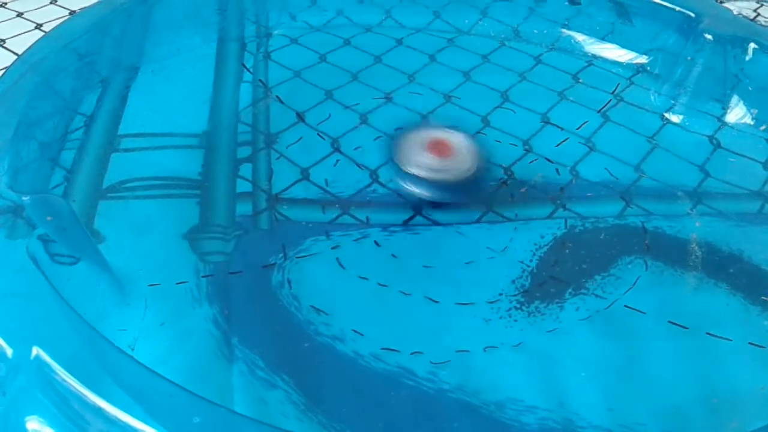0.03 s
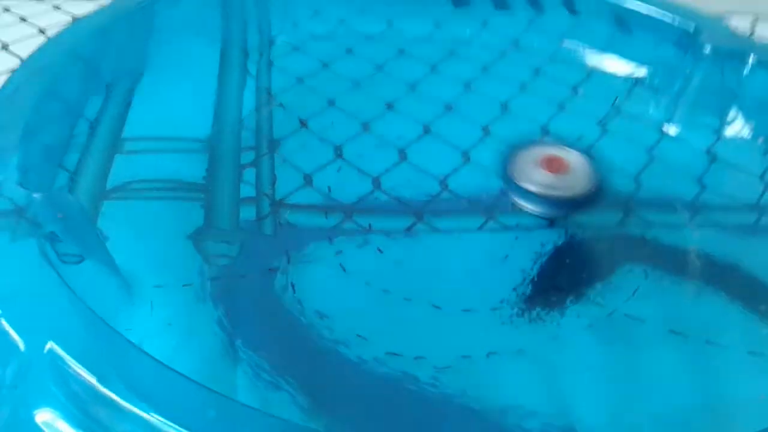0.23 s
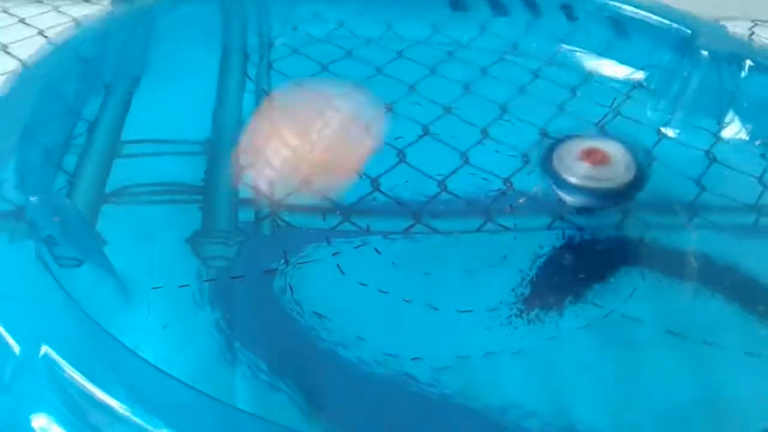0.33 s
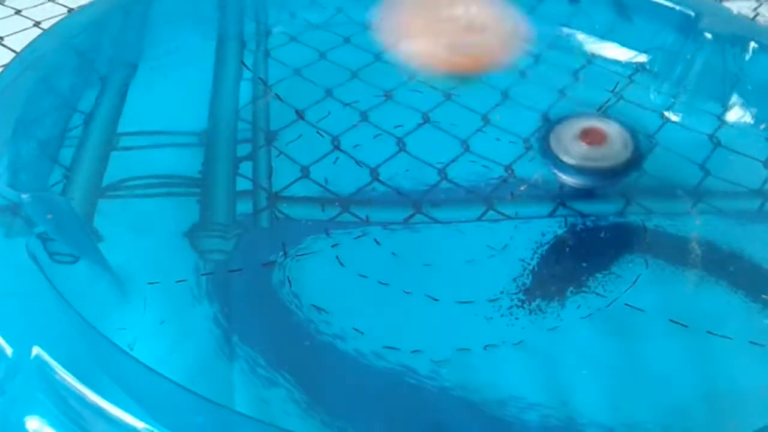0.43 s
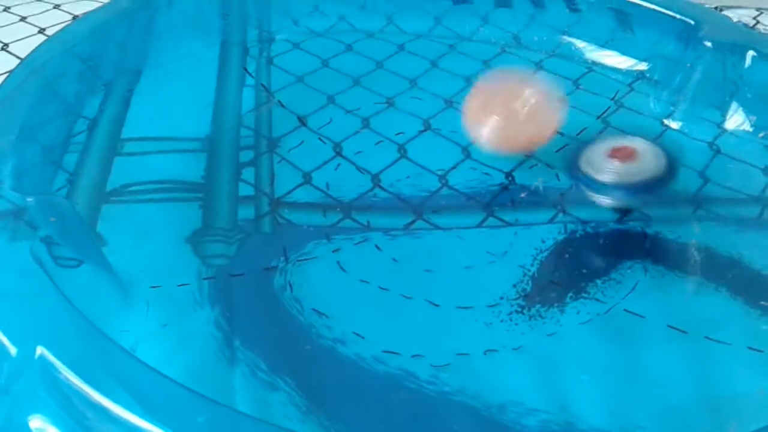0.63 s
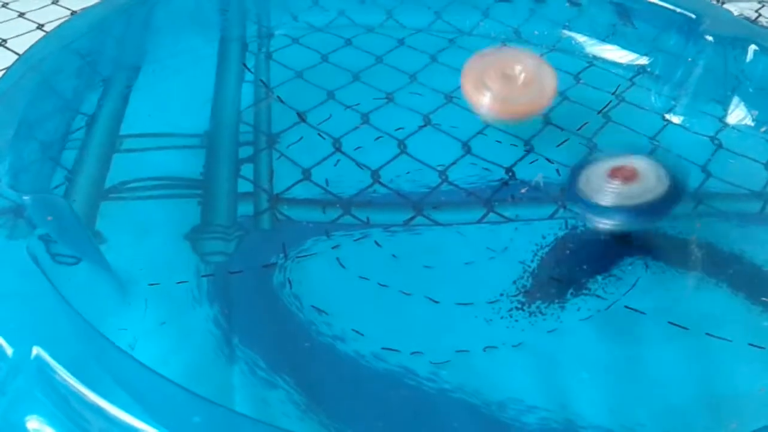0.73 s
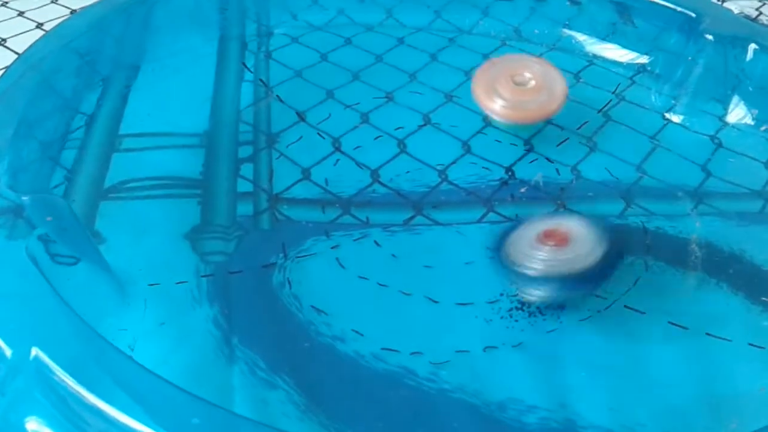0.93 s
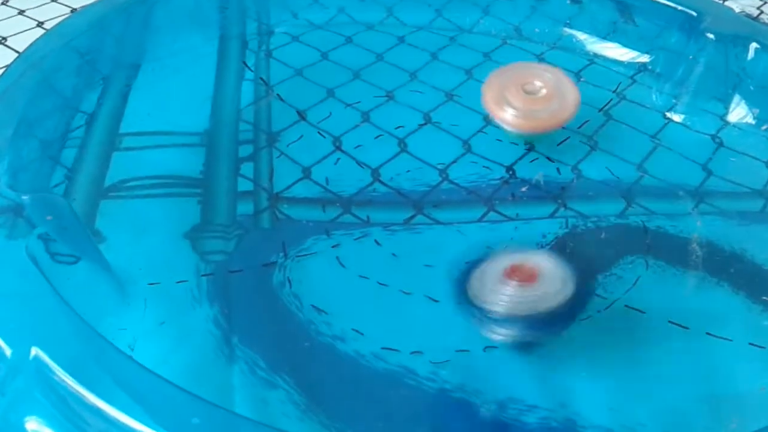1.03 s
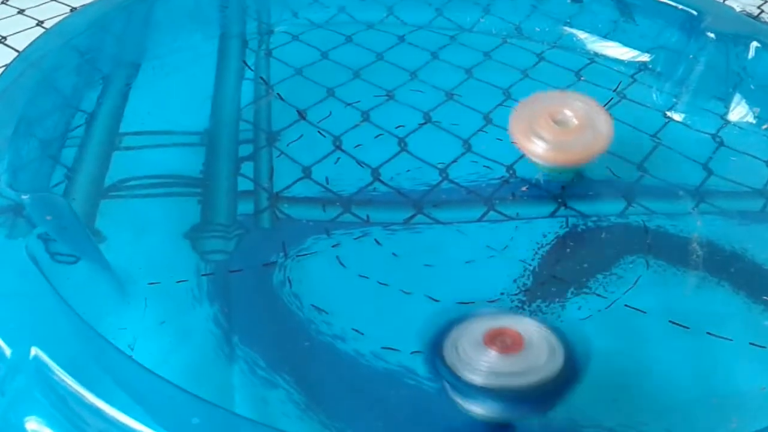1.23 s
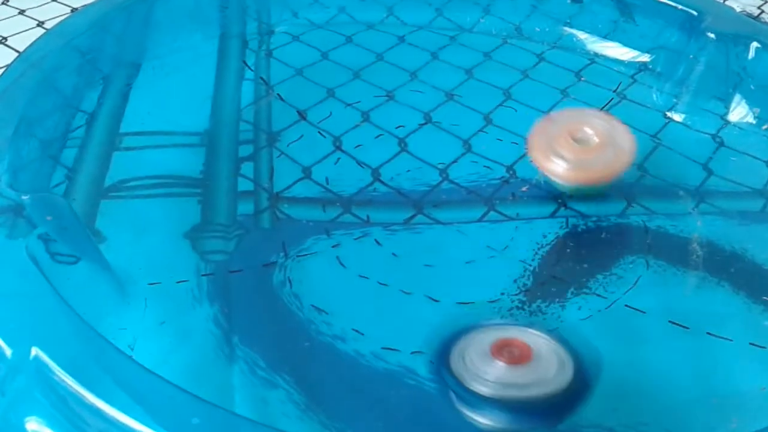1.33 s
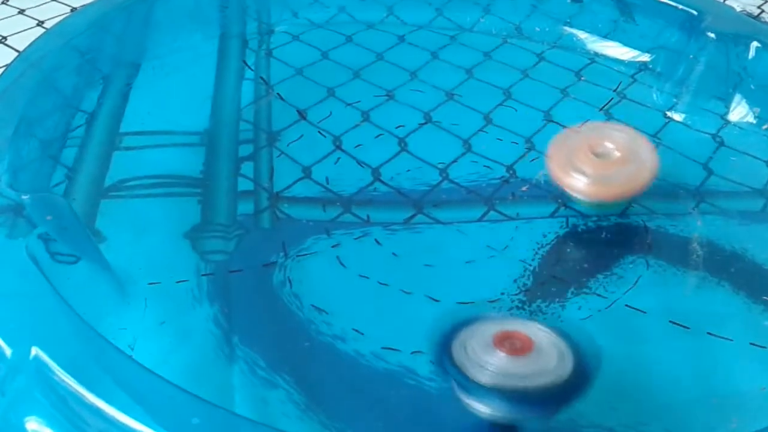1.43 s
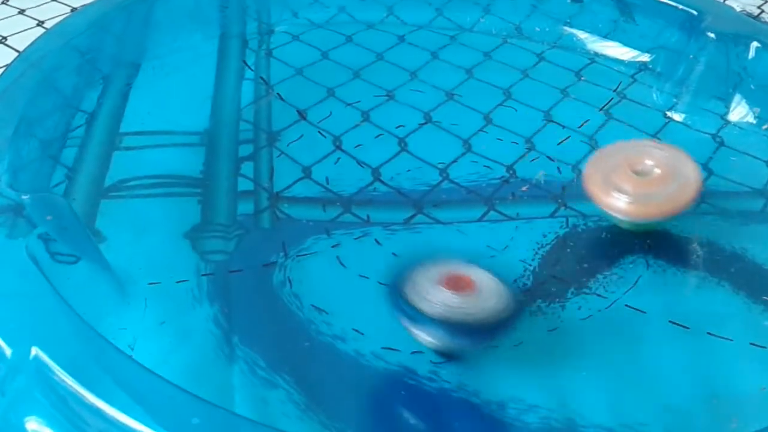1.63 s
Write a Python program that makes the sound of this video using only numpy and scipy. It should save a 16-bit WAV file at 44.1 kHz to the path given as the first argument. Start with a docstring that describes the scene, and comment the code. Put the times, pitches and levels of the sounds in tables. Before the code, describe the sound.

A spinning top launcher rasps, snaps loudly and rattles down, close up in a small room. The top knocks onto a hard plastic floor and clashes once with a second top, and both spin on with faint scuffing.

```python
"""A toy top spins in a hard plastic arena, its tip scuffing the floor by friction, while a hand bumps a
launcher above it. The pull drives teeth ever faster over a gear, so the pitch rips upward; the launcher
snaps against its stop and its ratchet runs down. The second top thuds onto the floor and excites its
modes, clashes rims with the first, and bounces. Both spin on with ticking tips in a small room."""
import sys
import numpy as np
from scipy import signal
from scipy.fft import rfft, irfft
from scipy.io import wavfile
from scipy.ndimage import uniform_filter1d

SR = 44100
rng = np.random.default_rng(int(sys.argv[2]) if len(sys.argv) > 2 else 0)


def store_wav(level_fs):
    """Save 16-bit WAV to argv[1]."""
    pcm = np.round(np.clip(np.atleast_2d(level_fs), -1, 1) * 32767)
    wavfile.write(sys.argv[1], SR, pcm.T.astype(np.int16))


N = 74970
T = np.arange(N) / SR
RING_T = T[:SR // 2]


def amp(db):
    """Decibels to amplitude ratio."""
    return 10 ** (np.asarray(db) / 20)


def curve(rows, column=1):
    """Linear interpolation of a table's column over time."""
    rows = np.array(rows)
    return np.interp(T, rows[:, 0], rows[:, column])


def at_frequency(points, hz):
    """Interpolation on a logarithmic frequency axis."""
    knots_hz, values = np.transpose(points)
    return np.interp(np.log(hz + 1), np.log(knots_hz + 1), values)


def add(mix, start_s, sound):
    """Superposition: a sound joins the mix at its onset."""
    part = mix[round(start_s * SR):][:len(sound)]
    part += sound[:len(part)]


def convolve(x, response):
    """Convolution with an impulse response, cut to the input's length."""
    return signal.fftconvolve(x, response)[:len(x)]


def colour(x, spectrum, size=4096):
    """Minimum-phase filtering to a given spectral shape, with unit energy."""
    log_gain = np.log(amp(at_frequency(spectrum, abs(np.fft.fftfreq(size, 1 / SR)))))
    response = np.exp(np.conj(signal.hilbert(log_gain)))
    taps = np.fft.ifft(response).real[:size // 2]
    return convolve(x, taps / np.linalg.norm(taps))


def highpass(x, hz):
    """Second-order attenuation below a cutoff."""
    return signal.sosfilt(signal.butter(2, hz, "highpass", fs=SR, output="sos"), x)


def fade(t60):
    """Damping: an exponential fall of 60 dB in t60 seconds."""
    return np.exp(-np.log(1000) * RING_T / t60)


def burst(t60):
    """Modal overlap: dense, short-lived vibrations merge into decaying noise."""
    return rng.standard_normal(len(RING_T)) * fade(t60)


def wash(decay):
    """Frequency-dependent damping: each band of noise dies at its own rate."""
    spectrum = rfft(rng.standard_normal(len(RING_T)))
    hz = np.fft.rfftfreq(len(RING_T), 1 / SR)
    centres, t60s = zip(*decay)
    bands = [at_frequency(list(zip(centres, weights)), hz) for weights in np.eye(len(decay))]
    return sum(irfft(spectrum * band, len(RING_T)) * fade(t60) for band, t60 in zip(bands, t60s))


def ring(modes):
    """Free vibration: a sum of damped sinusoids."""
    return sum(amp(db) * fade(t60) * np.sin(2 * np.pi * hz * RING_T) for hz, db, t60 in modes)


def uneven(spread_db):
    """Log-normal gains, limited to two standard deviations."""
    return amp(spread_db * np.clip(rng.standard_normal(N), -2, 2))


def clicks(rate, spread_db):
    """Impulse train: one uneven click per cycle, mean power near 1."""
    due = np.diff(np.floor(np.cumsum(rate) / SR), prepend=0)
    return due * np.sqrt(SR / rate) * uneven(spread_db)


def jitter(depth, samples):
    """Random modulation: a factor that wanders smoothly about 1."""
    drift = uniform_filter1d(rng.standard_normal(N), samples)
    return np.exp(depth * drift / np.sqrt(np.mean(drift ** 2)))


def chatter(hits, t60):
    """Incoherent addition: each click starts a short scrape of noise, and their powers sum."""
    power = fade(t60) ** 2
    envelope = np.sqrt(abs(convolve(hits ** 2, power / power.sum())))
    return envelope * rng.standard_normal(N)


# partials of the hum (frequency [Hz], level [dB])
HUM_PARTIALS = [(60, -73.5), (90, -84.5), (180, -76), (328, -79.5)]
# spectrum of the room's air (frequency [Hz], relative level [dB])
AIR_SPECTRUM = [(15, -28), (35, -11), (70, -3), (200, 4), (330, 2.5), (450, 0.5), (1300, -4.5), (3000, -14),
                (5500, -25), (15500, -36.5)]
def background():
    """Noise floor: a faint tonal hum over the broadband noise of the air."""
    hum = sum(amp(db) * np.sqrt(2) * np.sin(2 * np.pi * (hz * T + rng.random()))
              for hz, db in HUM_PARTIALS)
    return hum + amp(-67) * colour(rng.standard_normal(N), AIR_SPECTRUM)


# spinning tips (time [s], rotation rate [1/s], relative tick level [dB], rumble level [dB])
TIP_SPIN = [(0, 163, -50, -52.5), (.08, 145, -47.5, -52.5), (.17, 142, -46.5, -44.5),
            (.4, 132, -41.5, -61.5), (.57, 120, -68.5, -62.5), (.85, 126, -58.5, -59.5),
            (.95, 101, -59.5, -53), (1.04, 95, -59.5, -60), (1.15, 92.4, -62, -66.5), (1.35, 97, -69, -69),
            (1.52, 100, -70, -70.5), (1.63, 94, -64.5, -64), (1.7, 98, -72, -76.5)]
# spectra of the tick and the floor's rumble (frequency [Hz], relative level [dB])
TIP_SPECTRUM = [(40, -24.5), (200, 12.5), (800, 6), (1700, -4), (2600, -7), (3900, 0), (4700, 4),
                (5600, 0.5), (7500, -9.5), (9000, -7), (11500, -5.5), (13000, -17.5), (16000, -21)]
RUMBLE_SPECTRUM = [(25, -44.5), (70, -0.5), (130, 4.5), (280, -6.5), (420, -10), (800, -6.5), (1600, -14.5),
                   (3000, -18.5), (6000, -24), (15000, -40)]
# resonances excited by scuffing (frequency [Hz], bandwidth [Hz], relative level [dB])
SCUFF_BANDS = [(880, 440, 0), (1650, 700, 2.5), (3537, 730, -2), (4650, 1400, 0), (6940, 2000, -3),
               (9100, 670, -6.5), (11020, 2100, -5)]
def tips():
    """Friction: about once a turn a tip scuffs, exciting resonances unevenly, as the floor rumbles."""
    turns = clicks(curve(TIP_SPIN) * jitter(.15, samples=300), spread_db=2.5)
    turns *= amp(curve(TIP_SPIN, column=2))
    ticks = amp(-9) * colour(chatter(turns, t60=0.0096), TIP_SPECTRUM)
    for hz, width, db in SCUFF_BANDS:
        scuff = chatter(turns * uneven(spread_db=2.5), t60=0.02)
        resonance = signal.butter(2, [hz - width / 2, hz + width / 2], "bandpass", fs=SR, output="sos")
        ticks += amp(db - 12) * signal.sosfilt(resonance, scuff) * np.sqrt(SR / 2 / width)
    rumble = rng.standard_normal(N) * amp(curve(TIP_SPIN, column=3))
    return ticks + colour(rumble, RUMBLE_SPECTRUM)


# whirring of the tops (time [s], level [dB])
DRONE_LEVEL = [(0, -60), (1.2, -79.5), (1.4, -67), (1.6, -67), (1.7, -69)]
def drone(hz=267.5):
    """Amplitude modulation: the tops whirr in one faint tone of slowly changing level."""
    return amp(curve(DRONE_LEVEL)) * np.sin(2 * np.pi * hz * T)


# skids of a tip (time [s], level [dB], t60 [s])
TIP_SKIDS = [(.003, -39.5, 0.028), (.0125, -35.5, 0.0067), (0.0155, -38.5, .018), (.108, -43, .015),
             (.956, -48, .025), (1.022, -46.5, 0.024), (1.0852, -46, 0.016), (1.111, -55, 0.021),
             (1.13, -53, 0.035), (1.2136, -54, .02), (1.2605, -57.5, 0.027), (1.2763, -51.5, 0.021),
             (1.4086, -53, 0.02), (1.475, -63, 0.044), (1.6575, -50.5, 0.028), (1.6745, -47.5, 0.016),
             (1.6855, -53.5, 0.037), (1.69, -49, 0.029)]
# spectrum of a skid (frequency [Hz], relative level [dB])
SKID_SPECTRUM = [(60, -24.5), (300, -5.5), (1500, 0.5), (3800, -3.5), (5000, -1.5), (6000, -2.5),
                 (7500, -6.5), (10500, -2.5), (13000, -20), (16000, -6)]
def skids():
    """Sliding friction: each slip of a tip gives a sharp burst of noise."""
    slips = np.zeros(N)
    for s, db, t60 in TIP_SKIDS:
        add(slips, s, amp(db) * burst(t60))
    return colour(slips, SKID_SPECTRUM)


# bumps of hand and launcher (time [s], level [dB], frequency [Hz])
HAND_BUMPS = [(0.016, -29.5, 70), (0.05, -33.5, 163), (0.082, -35, 200.2), (.133, -47, 121),
              (0.173, -27, 115), (0.333, -30, 247), (0.929, -38, 91), (1.148, -44.5, 87.1)]
def bumps():
    """Soft impact: one low damped mode, whose gradual onset leaves no click."""
    thuds = np.zeros(N)
    onset = 1 - fade(t60=0.0059)
    for s, db, hz in HAND_BUMPS:
        add(thuds, s, ring([(hz, db, 0.026)]) * onset)
    return thuds


# teeth passing the gear (time [s], rate [1/s])
MESH_RATE = [(.17, 370), (.19, 492), (.2, 670), (.211, 800), (.22, 960), (.229, 1300), (.238, 1120),
             (.25, 1330)]
# strength of the pull (time [s], relative whine level [dB], relative rasp level [dB])
PULL_LEVELS = [(.165, -67.5, -57.5), (.188, -27, -37), (.207, -22, -30.5), (.2095, -22, -15),
               (.229, -23, -23), (.238, -33.5, -31.5), (.25, -38, -28.5), (.256, -67.5, -85)]
# spectra of whine and rasp (frequency [Hz], relative level [dB])
WHINE_SPECTRUM = [(200, -30.5), (600, -9), (1000, -3.5), (1550, 3.5), (2400, -6), (3400, -5.5), (5000, -11),
                  (9000, -30.5), (16000, -46.5)]
RASP_SPECTRUM = [(100, -29.5), (400, -10.5), (900, -17.5), (1500, -2), (2500, -3), (3300, 3), (4200, -2.5),
                 (5800, 2), (7500, -7.5), (10000, -5.5), (15500, -14.5)]
def rip():
    """Gear meshing: the rising tooth rate sets the pitch of a whine, and each tooth adds a dry rasp."""
    pulling = (T > PULL_LEVELS[0][0]) & (T < PULL_LEVELS[-1][0])
    teeth = clicks(curve(MESH_RATE) * jitter(.03, samples=100), spread_db=3) * pulling
    whine = teeth * amp(curve(PULL_LEVELS) - 5)
    rasp = chatter(teeth, t60=0.0067) * amp(curve(PULL_LEVELS, column=2) - 3.5)
    return colour(whine, WHINE_SPECTRUM) + colour(rasp, RASP_SPECTRUM)


# launcher impacts (time [s], pulse level [dB], thump level [dB], crack level [dB])
LAUNCHER_HITS = [(.209, -56, -46, -19), (0.2494, -3.5, -11, -13.5), (0.2527, -23, -9, -7.5),
                 (0.2566, -15, -13.5, -10), (0.2596, -30, -37.5, -16.5)]
# spectra of thump and crack (frequency [Hz], relative level [dB])
THUMP_SPECTRUM = [(20, -26.5), (100, -7), (260, -3.5), (380, -9), (480, -4.5), (600, -8.5), (760, -1.5),
                  (960, -1.5), (1400, -12.5), (2500, -16), (5000, -27.5)]
CRACK_SPECTRUM = [(710, -14), (1200, -7), (2620, -9), (3810, -4), (5490, -10), (8240, -11.5), (8880, -5.5),
                  (11600, -14.5), (15500, -10)]
def snap(swing_s=0.00064):
    """Impact transients: the launcher jolts, then hits its stop, with pulses, thumps and cracks."""
    u = RING_T / swing_s
    pulse = -u * (2 - u) * np.exp(-u)  # one swing of pressure and its slower return
    pulse /= abs(pulse).max()
    pulses, thumps, cracks = np.zeros((3, N))
    for s, pulse_db, thump_db, crack_db in LAUNCHER_HITS:
        add(pulses, s, amp(pulse_db) * pulse)
        add(thumps, s, amp(thump_db) * burst(t60=0.021))
        add(cracks, s, amp(crack_db) * burst(t60=0.032))
    return pulses + colour(thumps, THUMP_SPECTRUM) + colour(cracks, CRACK_SPECTRUM)


# slowing gear (time [s], click rate [1/s], ping level [dB], rattle level [dB])
GEAR_RUNDOWN = [(.262, 480, -32, -23.5), (.276, 420, -44, -28.5), (.281, 400, -44, -19),
                (.3, 325, -26.5, -24.5), (.32, 235, -34, -26.5), (.34, 175, -31.5, -31),
                (.362, 140, -29.5, -34.5), (.385, 105, -34.5, -43), (.413, 48, -39.5, -43.5)]
# modes of the pawl (frequency [Hz], relative level [dB], t60 [s])
PAWL_MODES = [(3390, 5, 0.0083), (3625, 4, 0.011), (3793, 7.5, 0.0078), (4040, -5, .008)]
# spectrum of the housing (frequency [Hz], relative level [dB])
RATTLE_SPECTRUM = [(180, -61), (300, -19), (849, -34.5), (1030, -33.5), (1160, -12.5), (1330, -11.5),
                   (2830, -11), (3690, -4), (4210, -4.5), (4960, -13.5), (5760, -9), (9140, -8.5),
                   (15500, -17.5)]
def ratchet(rise_s=0.00072):
    """Repeated impact: each tooth of the freed, slowing gear rings the pawl and rattles the housing."""
    coasting = (T > GEAR_RUNDOWN[0][0]) & (T < GEAR_RUNDOWN[-1][0])
    teeth = clicks(curve(GEAR_RUNDOWN), spread_db=0.5) * coasting
    ping = ring(PAWL_MODES) * (1 - np.exp(-(RING_T / rise_s) ** 2))
    pings = convolve(teeth * amp(curve(GEAR_RUNDOWN, column=2)), ping / np.linalg.norm(ping))
    rattle = chatter(teeth, t60=0.031) * amp(curve(GEAR_RUNDOWN, column=3))
    return pings + colour(rattle, RATTLE_SPECTRUM)


# a top's landings (time [s], boom level [dB], boom centre [Hz], knock level [dB], tick level [dB])
FLOOR_HITS = [(.3832, -19.5, 281, -15, -18), (0.3871, -23.5, 946, -17.5, -25), (.3958, -43, 300, -31, -39),
              (0.412, -34, 294, -29.5, -35), (.6172, -44.5, 328, -26.5, -24), (.734, -34, 164, -36, -32),
              (.7372, -78, 164.4, -36, -29.5), (.762, -45, 576, -44, -40), (.773, -78, 599, -50, -37.5),
              (0.8394, -44, 165, -41.5, -36.5), (.843, -50.5, 280, -42, -32.5),
              (0.9064, -47, 139, -46.5, -41), (.949, -56, 129, -49.5, -46), (1.666, -52.5, 695, -59.5, -71)]
# modes of the arena floor (frequency [Hz], relative level [dB], t60 [s])
FLOOR_MODES = [(144.4, -13, 0.51), (174.6, 2.5, 0.13), (209, -4, 0.17), (234.7, -1, 0.18), (284.8, 1, 0.17),
               (348, -11.5, 0.14), (601, 1, 0.06), (726, -8, 0.11), (787, -0.5, 0.076), (878, -3.5, 0.18),
               (963.8, -5.5, 0.22), (1093, -16, 0.27)]
# ringing after a knock (frequency [Hz], t60 [s])
KNOCK_T60 = [(100, 0.45), (500, 0.21), (1500, 0.11), (5000, 0.21), (14000, .15)]
# spectra of knock and tick (frequency [Hz], relative level [dB])
KNOCK_SPECTRUM = [(20, -42), (55, -15), (110, -12.5), (220, -4), (420, -9), (600, -9.5), (950, -3.5),
                  (1300, -10.5), (1900, -10), (3500, -22.5), (6000, -28.5), (15000, -39)]
TICK_SPECTRUM = [(30, -27), (150, 7.5), (1000, -3.5), (2600, -1.5), (3200, -11), (5600, -2), (7500, -19.5),
                 (15000, -17)]
def landings(spot_octaves=0.52, least_share=0.23):
    """Modal excitation: a top ticks and knocks on the thin floor; the spot sets which modes boom most."""
    booms, knocks, ticks = np.zeros((3, N))
    mode_hz = np.array(FLOOR_MODES)[:, 0]
    for s, boom_db, centre_hz, knock_db, tick_db in FLOOR_HITS:
        shares = least_share + np.exp(-(np.log2(mode_hz / centre_hz) / spot_octaves) ** 2)
        boom = sum(share * ring([mode]) for share, mode in zip(shares, FLOOR_MODES))
        add(booms, s, -amp(boom_db) * boom)
        flutter = highpass(wash(KNOCK_T60), hz=378)
        add(knocks, s, amp(knock_db) * (burst(t60=0.038) + amp(-7) * flutter))
        add(ticks, s, amp(tick_db) * burst(t60=0.025))
    body = highpass(booms, hz=90) + colour(knocks, KNOCK_SPECTRUM)
    return highpass(body, hz=75) + colour(ticks, TICK_SPECTRUM)


# contacts of the two rims (time [s], level [dB])
RIM_HITS = [(0.6128, -21), (.615, -23), (.6175, -16.5), (.6252, -22)]
# spectrum of a contact (frequency [Hz], relative level [dB])
RIM_SPECTRUM = [(40, -26.5), (200, -4), (600, -7.5), (1250, -1.5), (1700, -6.5), (2500, -5), (3900, -12),
                (4600, -2.5), (5150, -4.5), (5900, -1), (8000, -4.5), (9800, 4), (11500, -1.5), (13500, -4),
                (15000, -2), (16500, -8)]
# body modes of the rims (frequency [Hz], relative level [dB], t60 [s])
RIM_MODES = [(416, -11, 0.056), (1243, -7.5, 0.077), (1594, -3, 0.077), (4620, 0, 0.11), (5240, -3, .09),
             (5990, -4, 0.082)]
def clash():
    """Collision: the rims catch in quick succession, each time with a crack, a dense ring and a clack."""
    cracks, clacks = np.zeros((2, N))
    for s, db in RIM_HITS:
        add(cracks, s, amp(db) * (burst(t60=0.025) + amp(-15.5) * burst(t60=0.2)))
        add(clacks, s, amp(db - 17) * ring(RIM_MODES))
    return colour(cracks, RIM_SPECTRUM) + clacks


# reverberation time of the room (frequency [Hz], t60 [s])
ROOM_T60 = [(100, 0.52), (1000, .3), (5000, .34), (10000, .3), (15000, .25)]
def room(x, wet_db):
    """Reverberation: a small room's short, thin tail builds up behind the direct sound."""
    tail = highpass(wash(ROOM_T60), hz=343.6) * (1 - fade(t60=0.088))
    return x + amp(wet_db) * convolve(x, tail / np.linalg.norm(tail))


def scene():
    """Superposition: the close launcher is heard drier than the tops in the arena."""
    spinning = room(tips() + drone() + skids(), wet_db=-15)
    launcher = bumps() + room(rip() + ratchet(), wet_db=-19) + room(snap(), wet_db=-42)
    impacts = room(landings(), wet_db=-14.5) + room(clash(), wet_db=-10.5)
    return (background() + spinning + launcher + impacts)[None]


def record(dry, ceiling=.8, edge_hz=15900):
    """Saturation and band limiting: the microphone sheds deep bass, rounds peaks and cuts top treble."""
    rounded = ceiling * np.tanh(highpass(dry, hz=48) / ceiling)
    lowpass = signal.firwin(511, edge_hz, window=("kaiser", 9), fs=SR)
    return signal.oaconvolve(rounded, lowpass[None], "same")


dry = scene()
out = record(dry)
store_wav(out)
```